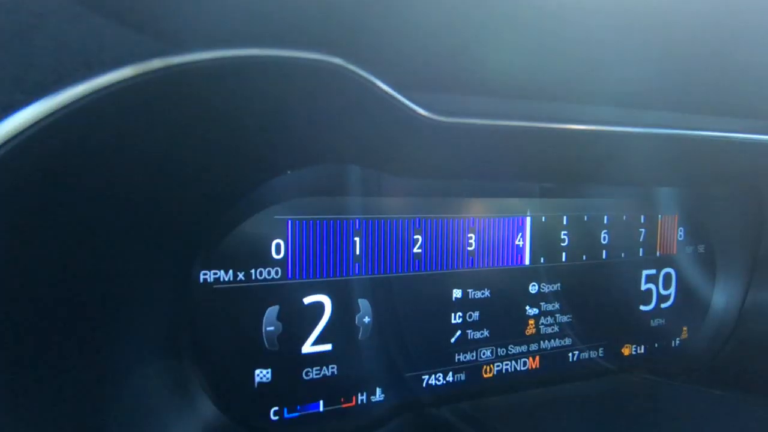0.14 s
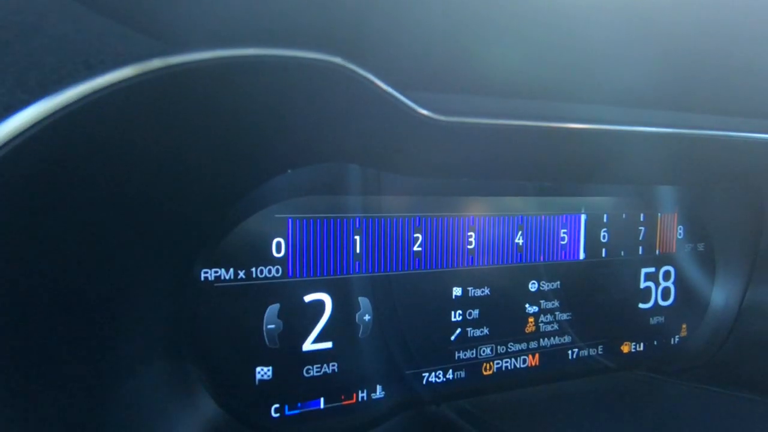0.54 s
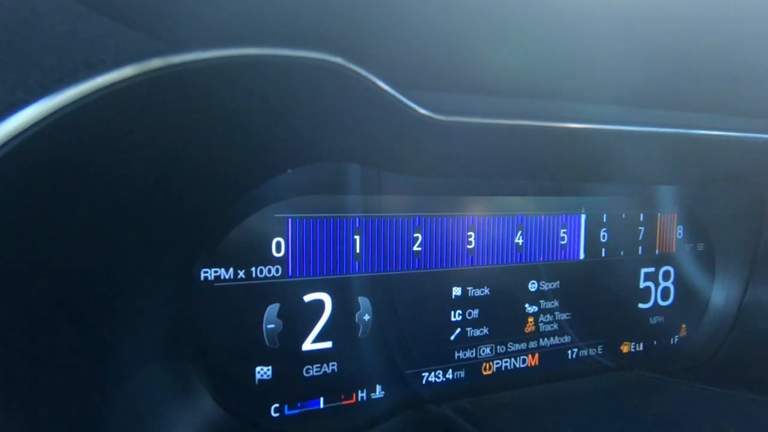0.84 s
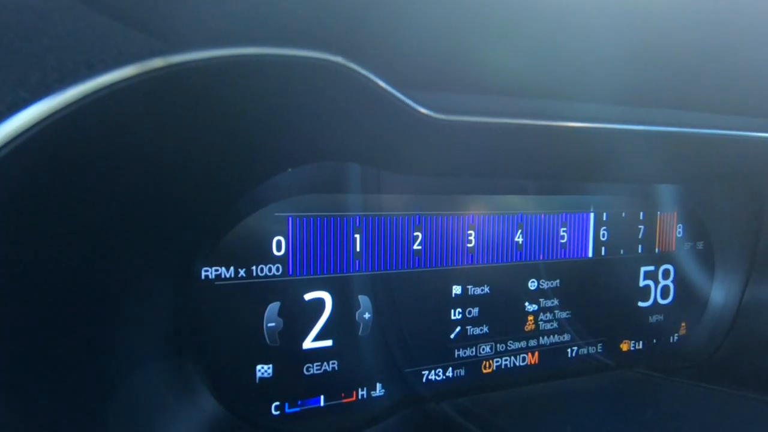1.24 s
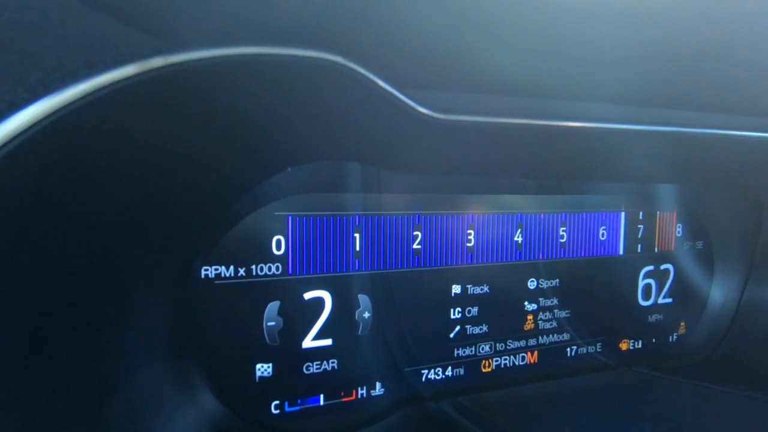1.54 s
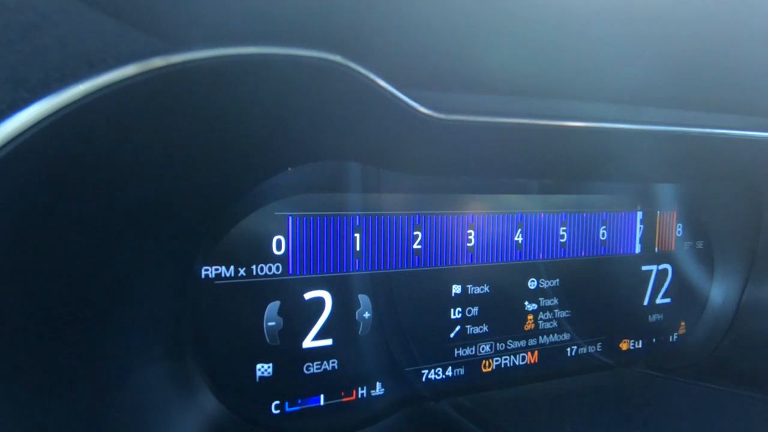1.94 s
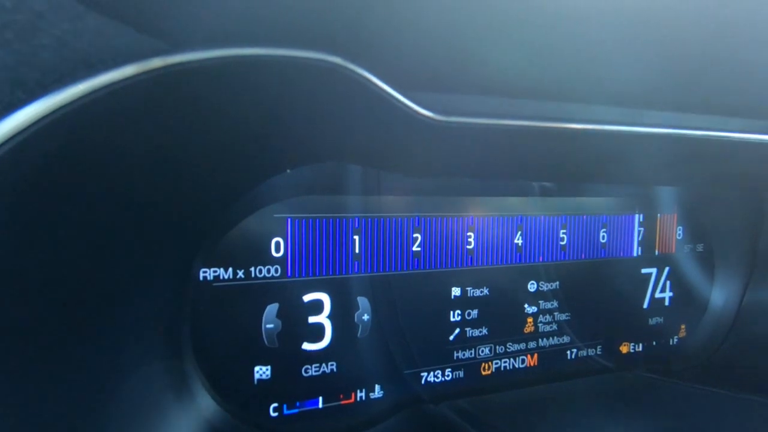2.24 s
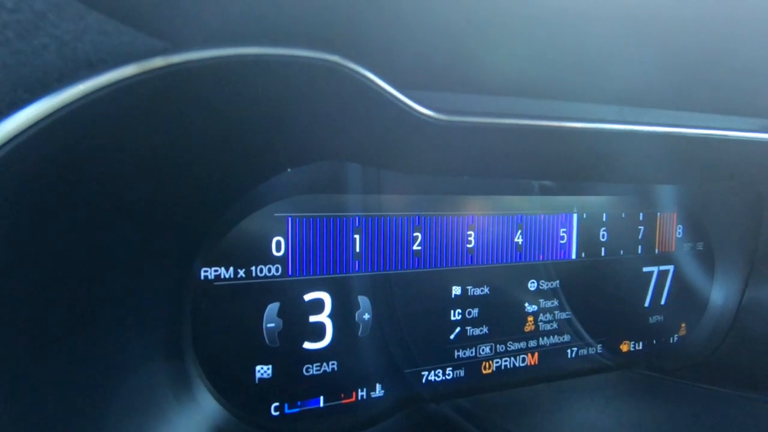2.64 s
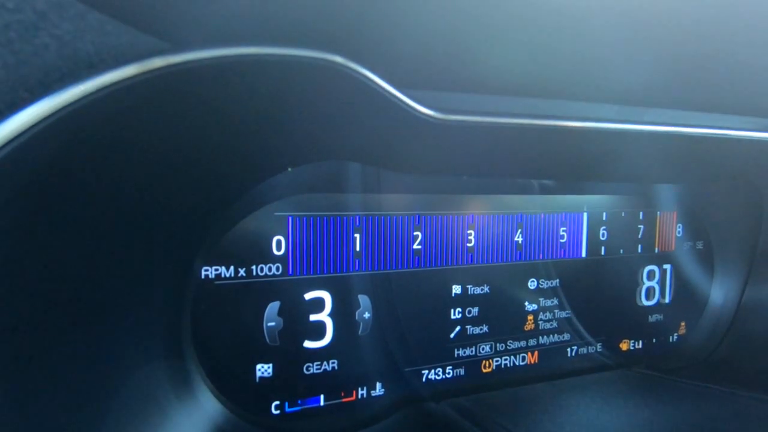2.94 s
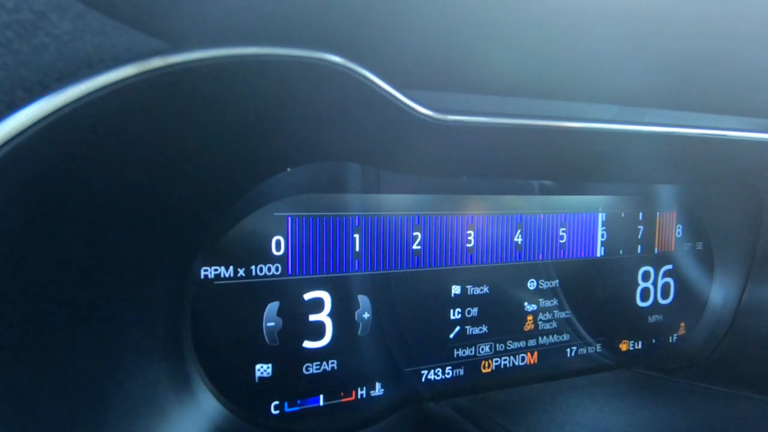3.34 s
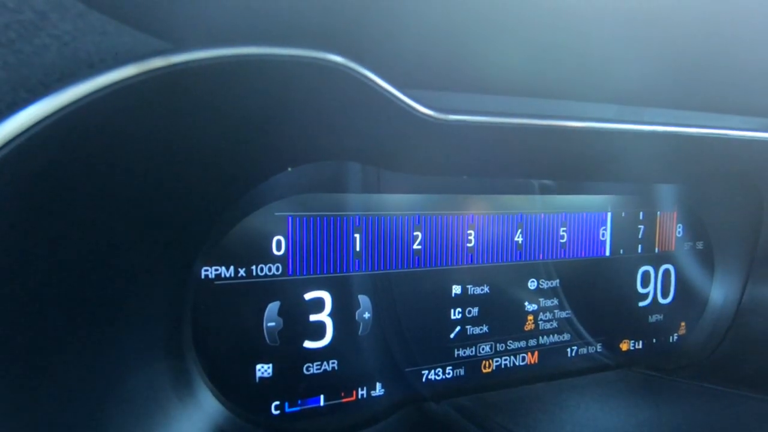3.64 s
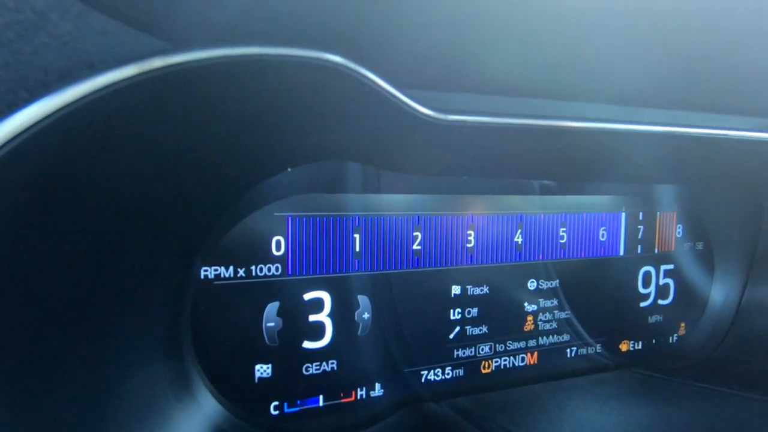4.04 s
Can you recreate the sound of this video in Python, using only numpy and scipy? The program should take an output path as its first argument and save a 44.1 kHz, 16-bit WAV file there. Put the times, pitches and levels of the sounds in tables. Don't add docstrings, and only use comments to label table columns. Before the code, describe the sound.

Heard inside a moving car near the dashboard, a supercharged V8 jumps up in revs on a downshift, drones for under a second, then surges at full throttle to a rough, stuttering peak. An upshift drops the pitch and a long pull climbs again. Intake roar, faint blower whine, tyre rumble and low bumps surround it; the overloaded microphone crackles and compresses.

```python
import sys
import numpy as np
from scipy import signal
from scipy.fft import rfft, irfft, next_fast_len
from scipy.io import wavfile
from scipy.ndimage import uniform_filter1d, minimum_filter1d

SR = 44100
rng = np.random.default_rng(int(sys.argv[2]) if len(sys.argv) > 2 else 0)


def transcribe(signal):
    frames = np.atleast_2d(signal).T
    limited = np.clip(frames, -1, 1)
    pcm = np.round(limited * 32767).astype(np.int16)
    wavfile.write(sys.argv[1], SR, pcm)


def undo_db(level):
    steps = np.asarray(level, float) / 20
    return 10 ** steps


N = 184368

# start_s, four-stroke cycle_hz, exhaust level_db, air flow as intake roar level_db
DRIVE = [(0.0, 33.05, -8, -49), (.06, 35.6, -15, -41.5), (.14, 44.8, -11, -32.5), (.2, 45.04, -11.5, -35.5),
         (.29, 45.25, -19, -49), (.77, 45.5, -10.5, -45), (.92, 46.46, -11, -37.5),
         (1.06, 46.48, -7.5, -36), (1.3, 50.92, -11.5, -32), (1.56, 58.46, -10.5, -33.5),
         (1.8, 57.56, -11, -32), (2.1, 58.41, -10.5, -31.5), (2.3, 46.34, -11, -34),
         (2.42, 43.06, -10.5, -35), (2.97, 47.22, -10.5, -39), (3.86, 53.85, -12, -40.5),
         (4.02, 54.42, -12, -38), (4.16, 56.77, -14, -38)]
# start_s, output height of the overload point (1 = full scale)
RECORDER_GAIN = [(0, .42), (.12, .44), (.42, .59), (.76, .61), (.86, .54), (1.07, .54), (1.3, .37),
                 (4.18, .39)]


def in_time(rows):
    s, *columns = np.transpose(rows)
    return [np.interp(np.arange(N) / SR, s, column) for column in columns]


def rms_one(x):
    return x / np.sqrt(np.mean(x ** 2) + 1e-20)


def drift(rate_hz, count=N):
    pole = np.exp(-80 * np.pi * rate_hz / SR)
    noise = rng.standard_normal(N // 40 + 1002)
    slow = signal.lfilter([1], [1, -2 * pole, pole * pole], noise)[1000:]
    return np.interp(np.linspace(0, N / 40, count), np.arange(len(slow)), rms_one(slow))


def coloured(x, spectrum):
    hz, db = np.transpose(spectrum)
    size = next_fast_len(N)
    log_hz = np.log(np.arange(size // 2 + 1) * SR / size + 1)
    corner_hz = np.r_[hz[0] / 4, hz, hz[-1] * 2]
    corner_db = np.r_[db[0] - 40, db, db[-1] - 20]
    shape_db = np.interp(log_hz, np.log(corner_hz), corner_db)
    return rms_one(irfft(rfft(x, size) * undo_db(shape_db), size)[:N])


def peaks_db(hz, peaks):
    return sum(db / (1 + (2 * (hz - centre) / width) ** 2) for centre, width, db in peaks)


def shut_share(roar_db):
    return np.clip((-40 - roar_db) / 14, 0, 1)


def stages():
    # start_s, blend_s, firing unsteadiness_db
    drive_stages = [
        (-1, .1, 2.8),
        (.13, .08, 1.2),
        (1.0, .25, 2.2),
        (1.44, .12, 2.9),
        (2.12, .2, 1.8),
        (2.82, .24, 1.5),
    ]
    t = np.arange(N) / SR
    begun = [np.clip((t - start) / blend, 0, 1) for start, blend, _ in drive_stages]
    shares = -np.diff(begun + [np.zeros(N)], axis=0)
    return shares, np.array(drive_stages)[:, 2] @ shares


def order_db(k):
    # multiple of the cycle, level_db
    blip_orders = [(1, -10.5), (3, -5.5), (4, 0.5), (5, 3), (6, -9.5), (7, -12.5), (8, 3.5), (9, -22),
                   (10, -12.5), (13, -8), (16, -12), (30, -26.5), (48, -58)]
    cruise_orders = [(1, -1), (2, -8.5), (3, -2.5), (4, -12.5), (5, -1.5), (6, -3.5), (7, -19), (8, -7),
                     (9, -19.5), (10, -6.5), (11, -17), (12, -18.5), (13, -13.5), (14, -14.5), (15, -12),
                     (16, -47.5), (17, -31), (48, -48)]
    pull_orders = [(1, -7.5), (2, -7), (3, -3), (4, -5.5), (5, -3), (6, -3.5), (7, -11), (8, -11), (9, -10),
                   (10, -7), (11, -17.5), (12, -15), (13, -25.5), (14, -13.5), (15, -16), (16, -25),
                   (17, -22), (30, -36.5), (48, -56)]
    limiter_orders = [(1, 0), (2, 0.5), (3, 4), (4, -0.5), (5, -3.5), (6, -1), (7, -6.5), (8, -8),
                      (9, -17.5), (10, -4), (11, -14.5), (12, -24.5), (13, -19.5), (14, -24.5), (15, -14),
                      (16, -35.5), (17, -25), (30, -38.5), (48, -65)]
    shift_orders = [(1, 1), (2, -9.5), (3, -0.5), (4, -3), (5, -3.5), (6, -2.5), (7, -1), (8, 0), (9, -17),
                    (10, -11), (11, -14), (12, -16), (13, -13.5), (14, -14), (15, -12.5), (16, -20.5),
                    (17, -19), (30, -33), (48, -61)]
    # multiple of the cycle, cruise_lift_db, load_lift_db
    standout_orders = [(17, 7, 2), (18, 4.5, 4), (20, 9.5, -5.5), (22, 4, -6), (24, 12.5, -3), (26, -12, 5),
                       (27, 2, -5.5), (28, 4.5, 5), (32, 8, 3), (35, 0, -1), (38, 7.5, 1.5), (43, 7.5, -1),
                       (48, 16, 0)]
    cruising, loaded = {m: (a, b) for m, a, b in standout_orders}.get(k, (0, 0))
    low_gear = loaded + 6 * (k == 8)
    fuel_cut = 5.5 * (k > 16) * (2 * (k % 2) - 1)
    lifts = [0, cruising, low_gear, fuel_cut, loaded, loaded]
    profiles = (blip_orders, cruise_orders, pull_orders, limiter_orders, shift_orders, pull_orders)
    return np.add(lifts, [np.interp(k, *np.transpose(profile)) for profile in profiles])


def exhaust(cycle_hz, turns, roar_db):
    # centre_hz, width_hz, lift_db
    cabin_booms = [(114.4, 41, 5.5), (213.8, 10, -4.5), (222.4, 43, 5), (265, 32, 6), (304, 10, 1),
                   (371, 14, -5), (414, 29.4, 7.5), (452.7, 17, -4), (558, 14, 3), (610, 84, -1),
                   (676, 20, 3.5), (804, 13, 8), (1124, 31, 2.5), (1310, 130, 5)]
    strong_beat_s = .337
    drag_db_per_hz_s = .07
    pipe_lag_cycles = .085
    coarse, fine = np.arange(0, N, 32), np.arange(0, N, 4)
    shares, unsteady_db = [c[..., ::32] for c in stages()]
    slowing = np.maximum(-np.gradient(cycle_hz)[::32] * SR, 0)
    unsteady_db = unsteady_db + drag_db_per_hz_s * slowing
    since_beat = turns[::4] - turns[int(strong_beat_s * SR)]
    shut = shut_share(roar_db[::32])
    out, power = np.zeros(len(fine)), 0
    for k in range(1, 49):
        size = undo_db(order_db(k) @ shares + peaks_db(k * cycle_hz[::32], cabin_booms))
        shut_loss_db = .27 * max(k - 15, 0) + 7 * (k % 12 == 0) - 5 * (k == 6)
        size = size * undo_db(-shut_loss_db * shut)
        power = power + size ** 2 / 2
        wobble = undo_db(.75 * unsteady_db * np.minimum(drift(7.0, count=len(coarse)), 1))
        level = np.interp(fine, coarse, size * wobble)
        spread = .2 if k < 9 else .45
        jitter = .02 * unsteady_db * (1 + k / 10) * drift(4 + k / 3, count=len(coarse))
        lag = spread * (rng.random() - .5) + jitter + pipe_lag_cycles * k ** 2 * (k < 9)
        out += level * np.cos(2 * np.pi * (k * since_beat + np.interp(fine, coarse, lag)))
    evened = out / np.interp(fine, coarse, np.sqrt(power))
    return signal.resample_poly(evened, up=4, down=1)[:N]


def puffs(turns, sharp):
    firing = (8 * turns).astype(int)
    pattern_db = np.array([-8.5, -13.0, -12.5, 3.5, -0.5, -13.5, 1.0, -5.5])
    chance_db = 1.2 * rng.standard_normal(firing.max() + 1)
    strength = undo_db(pattern_db[firing % 8] + chance_db[firing])
    return strength * np.exp(-sharp * (8 * turns % 1))


def burning(turns):
    # pitch_hz, level_db per Hz
    burn_spectrum = [(60, -31), (120, 2.5), (250, 1), (500, -2), (1000, -29.5), (2000, -27.5),
                     (4000, -48.5)]
    noise = coloured(rng.standard_normal(N) * puffs(turns, sharp=0.34), burn_spectrum)
    cruise_share = stages()[0][1]
    return 0.23 * (1 - .5 * cruise_share) * noise


def intake_roar(turns, roar_db):
    # pitch_hz, level_db per Hz
    air_spectrum = [(410, -24), (780, -0.5), (1050, -17), (1270, -12), (2100, -17), (2600, -18.5),
                    (8460, -36.5), (15600, -44.5)]
    gusts = rng.standard_normal(N) * (0.75 + puffs(turns, sharp=5.3))
    roar = undo_db(roar_db + 1.0) * coloured(gusts, air_spectrum)
    top = signal.sosfilt(signal.butter(1, 3000, "high", fs=SR, output="sos"), roar)
    return roar - .8 * shut_share(roar_db) * top


def blower_whine(cycle_hz, turns, roar_db):
    # centre_hz, width_hz, lift_db
    duct_rings = [(1730, 60, 10), (1995, 70, 19), (2120, 90, 11)]
    sweep_hz_s = np.abs(np.gradient(cycle_hz) * SR)
    level_db = -61 + .4 * (roar_db + 40) + peaks_db(37 * cycle_hz, duct_rings)
    level_db = level_db - .3 * sweep_hz_s
    level = undo_db(level_db + 2.0 * drift(8.0))
    return level * np.sin(2 * np.pi * (37 * turns + .07 * drift(12.0)))


def engine():
    cycle_hz, exhaust_db, roar_db = in_time(DRIVE)
    turns = np.cumsum(cycle_hz) / SR
    boom = undo_db(exhaust_db) * (exhaust(cycle_hz, turns, roar_db) + burning(turns))
    return boom + intake_roar(turns, roar_db) + blower_whine(cycle_hz, turns, roar_db)


def road():
    # pitch_hz, level_db per Hz
    rumble_spectrum = [(10, 6.5), (20, 4), (32, 7), (45, -1), (62, 5), (80, -1), (120, -2), (300, -38.5)]
    crank_db = 0.63 * np.maximum(in_time(DRIVE)[0] - 45, 0)
    speed_db = 1.83 * np.arange(N) / SR
    level_db = -27 + crank_db + speed_db + 0.67 * drift(3.3)
    return undo_db(level_db) * coloured(rng.standard_normal(N), rumble_spectrum)


def jolts():
    # start_s, level_db, pitch_hz, t60_s, first push sign
    bumps = [(.013, 7, 23.5, .4, -1), (.034, 10, 26, .08, 1), (.077, 5, 28, .07, 1), (.302, 2, 28, .25, -1),
             (.438, 1, 30, .2, -1), (1.9, -1, 18, .15, 1), (2.2, -3, 28, .2, -1), (2.476, -4, 25, .12, 1),
             (3.252, -11, 20, .15, 1), (3.486, 8, 21, .11, 1), (3.805, -3, 16, .12, -1),
             (3.987, -2, 25, .12, 1), (4.136, 10, 22, .12, 1)]
    t = np.arange(N) / SR
    out = np.zeros(N)
    for start, db, hz, t60, sign in bumps:
        age = np.maximum(t - start, 0)
        out += sign * undo_db(db - 60 * age / t60) * np.sin(2 * np.pi * hz * age)
    return out


def heave():
    # time_s, share of the overload pressure
    pressure_crests = [(.02, 0), (.25, .14), (.38, .2), (.49, .4), (.64, .48), (.83, .48), (.96, .1),
                       (1.17, .42), (1.34, .16), (1.51, .2), (1.67, .22), (1.79, .27), (1.93, .4),
                       (2.15, .2), (2.32, .25), (2.5, .15), (2.7, .25), (2.96, .4), (3.11, .36), (3.26, .3),
                       (3.49, .58), (3.66, .35), (3.81, .2), (3.98, .42), (4.18, .33)]
    crest_s, crest = np.transpose(pressure_crests)
    turn_s = np.sort(np.r_[crest_s, (crest_s[1:] + crest_s[:-1]) / 2])
    share = np.repeat(crest, 2)[:-1]
    share[1::2] = -1.05 * (crest[1:] + crest[:-1]) / 2
    index = np.arange(len(turn_s))
    place = np.interp(np.arange(N) / SR, turn_s, index)
    step = np.floor(place)
    eased = step + (1 - np.cos(np.pi * (place - step))) / 2
    return 1.25 * np.interp(eased, index, share)


def scene():
    height = in_time(RECORDER_GAIN)[0]
    pressure = (engine() + road()) * undo_db(-1.03) + 0.38 * (jolts() + heave())
    return (pressure / height)[None]


def overload(x):
    leak = .06
    return (1 - leak) * np.clip(x, -1.75, 1) + leak * x


def two_bands(x):
    lift_db = 3.1 * (1 - np.exp(-np.arange(N) / SR / .12))
    low, high = [np.tile(signal.butter(2, 250, kind, fs=SR, output="sos"), (2, 1))
                 for kind in ("low", "high")]
    first = x[:, :1]
    swing = x - first
    return first + signal.sosfilt(low, swing) + undo_db(lift_db) * signal.sosfilt(high, swing)


def limiter(x, top):
    room = minimum_filter1d(np.minimum(1, top / (np.abs(x) + 1e-9)), size=441)
    return x * uniform_filter1d(room, size=441)


def roll_off(x):
    return signal.sosfilt(signal.butter(12, 15710, fs=SR, output="sos"), x)


def record(dry):
    x = overload(dry) * in_time(RECORDER_GAIN)[0]
    first = x[:, :1]
    x = two_bands(x)
    x = signal.sosfilt(signal.butter(1, 3.2, "high", fs=SR, output="sos"), x)
    dull = signal.butter(3, 10500, fs=SR, output="sos")
    x = first + signal.sosfilt(dull, x - first)
    settling = np.interp(np.arange(N), [0, 130, N - 130, N], [.7, 1, 1, .35])
    mix = limiter(x * settling, top=.9)
    return roll_off(mix)


dry = scene()
out = record(dry)
transcribe(out)
```